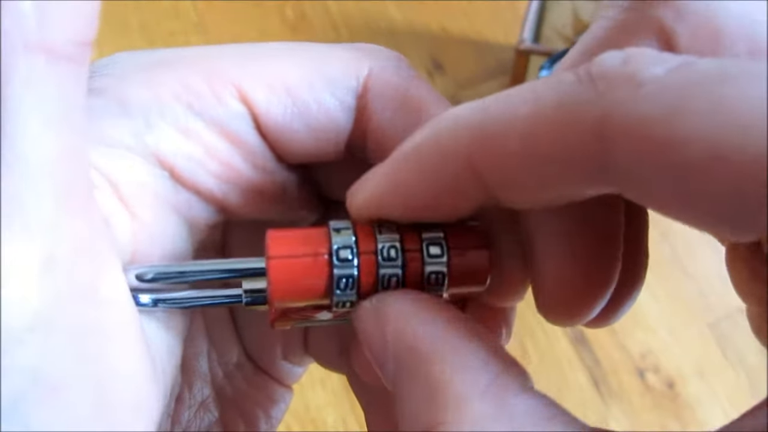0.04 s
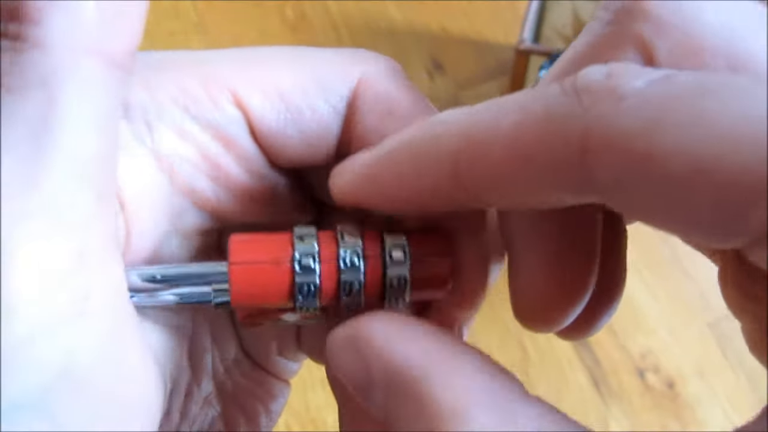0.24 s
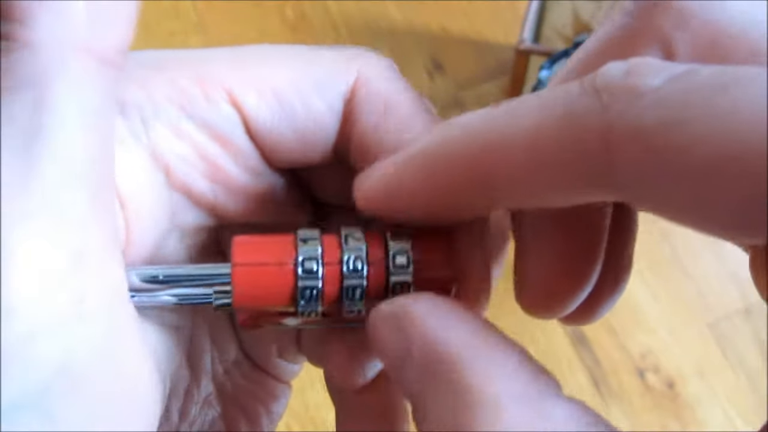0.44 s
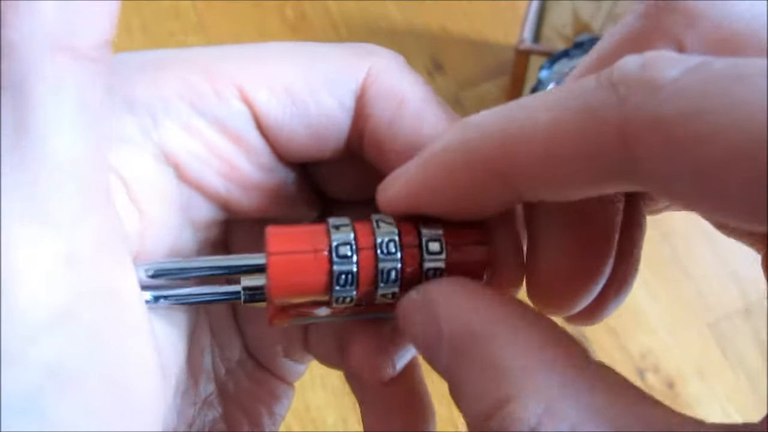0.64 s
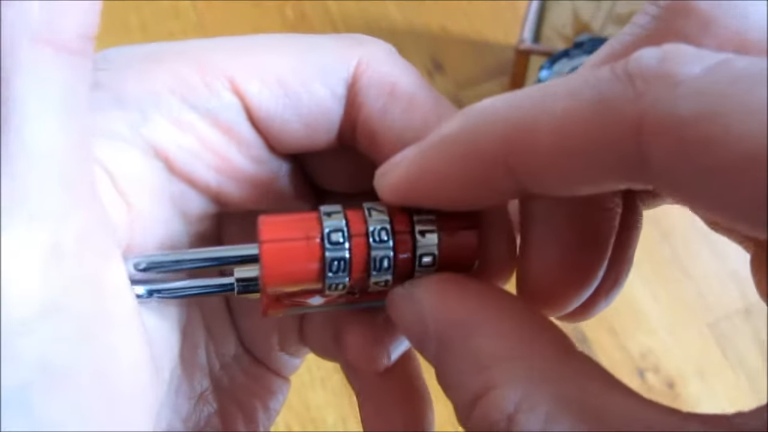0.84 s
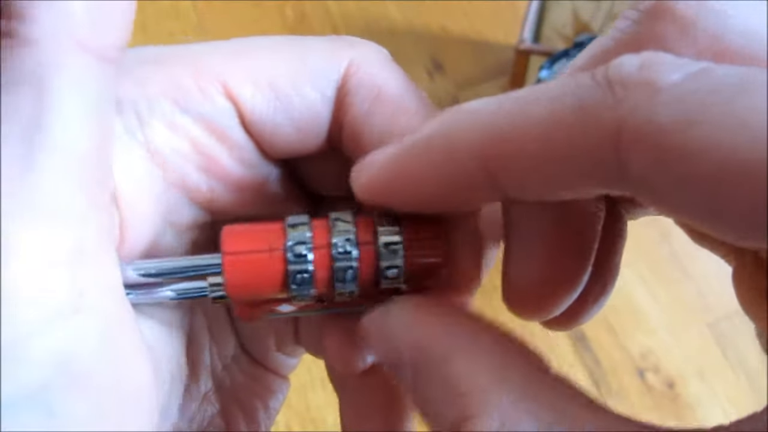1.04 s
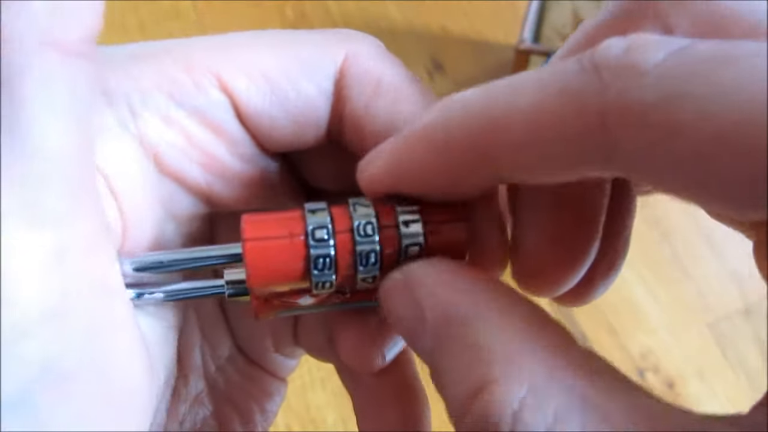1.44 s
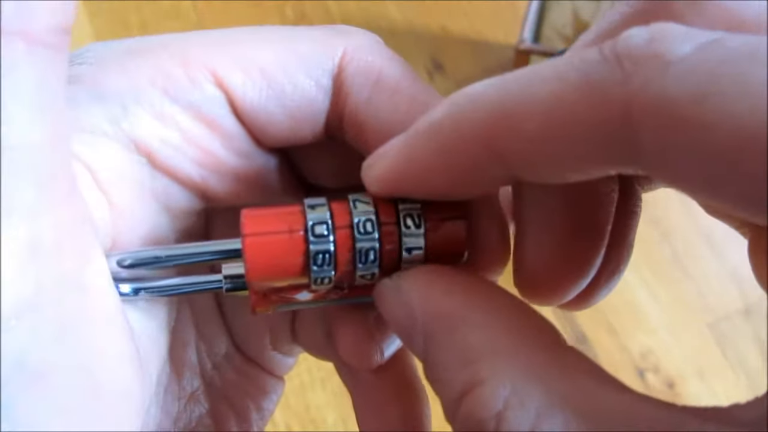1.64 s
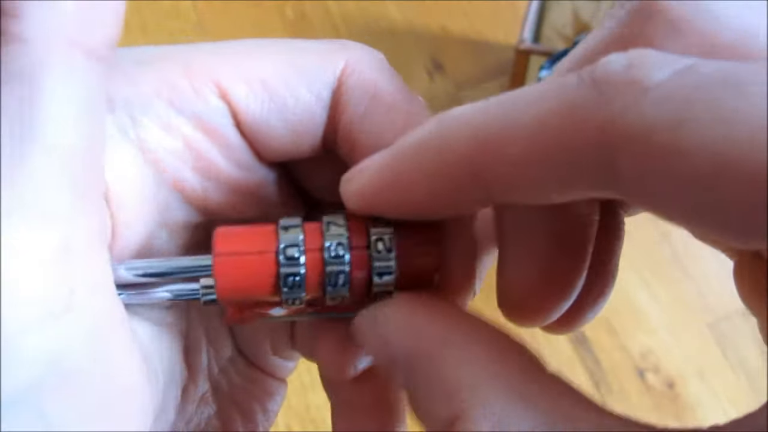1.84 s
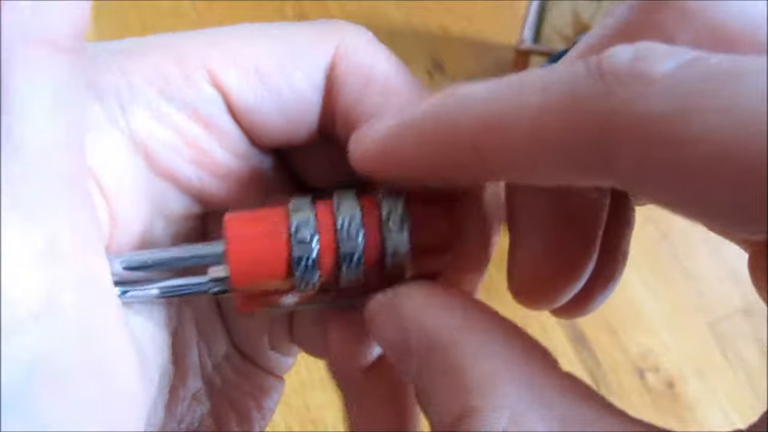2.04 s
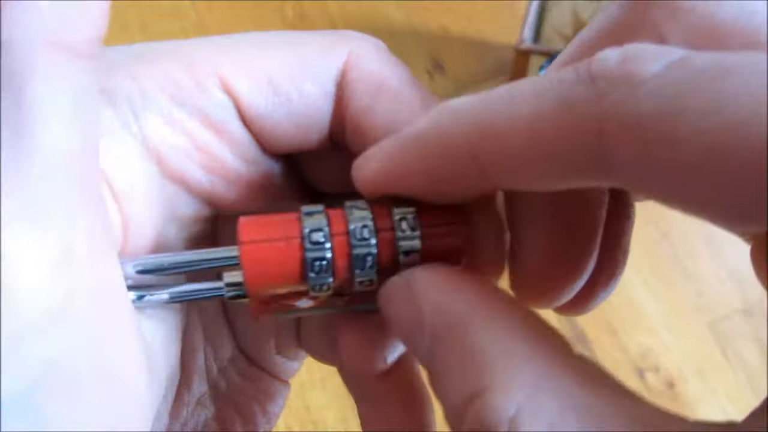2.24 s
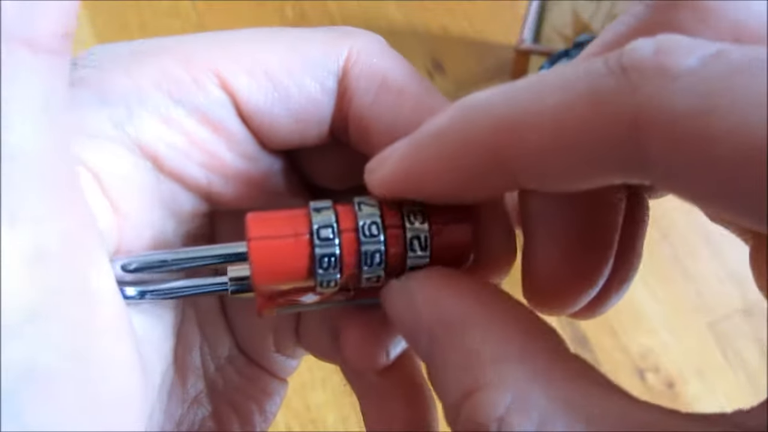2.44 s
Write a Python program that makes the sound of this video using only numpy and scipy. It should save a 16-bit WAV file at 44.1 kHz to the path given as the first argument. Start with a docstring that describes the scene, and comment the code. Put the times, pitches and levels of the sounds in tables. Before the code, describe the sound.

A small combination padlock clicks close to the microphone. Its dials snap from notch to notch, alternating irregularly with sharper knocks of the tugged metal shackle and light rattling, over a quiet room's low hum.

```python
"""A small three-dial combination padlock is handled close by, over a quiet room's rumble and hum.
First loose parts tick; at 0.2 s a dial's spring scrapes up its ramp and snaps into a detent, and the
tugged shackle knocks on its stop. Snaps and knocks then alternate, with light rattling and two faint
stick-slip squeaks; from 2 s on, a last few snaps and ticks follow. Each impact excites damped modes
of the metal, which die away in the room."""
import sys
import numpy as np
from scipy import signal
from scipy.fft import rfft, irfft
from scipy.io import wavfile
from scipy.ndimage import uniform_filter1d

SR = 44100
rng = np.random.default_rng(int(sys.argv[2]) if len(sys.argv) > 2 else 0)


def wrap_up_sound(samples):
    """Save the sound to the file named by the first command line argument, as 16-bit audio."""
    columns = np.atleast_2d(samples).T
    # keep every value between -1 and 1, then stretch to whole-number steps
    tamed = np.clip(columns, -1, 1)
    steps = np.round(tamed * 32767).astype(np.int16)
    wavfile.write(sys.argv[1], SR, steps)


N = 110250
HIT_SIZE, REF_SIZE = 2048, 88  # samples: one contact's buffer, the 2 ms energy reference
RISE_S = 0.000068  # onset of a contact force

# Normal modes of casing, shackle and dial rim: f/Hz, relative level/dB, T60/s
CASING_MODES = [(3350, -21.5, .008), (4550, -3, 0.0024), (4984, 29, 0.013), (5400, -7, .006)]
SHACKLE_MODES = [(7560, -4.5, 0.022), (7920, 8.5, 0.018), (8060, 12.5, 0.0055)]
RIM_MODES = [(13900, 0, .006), (15200, -2, .005)]
# Spectrum of the shackle's contacts: f/Hz, relative density level/dB
SHACKLE_SPECTRUM = [(60, -41.5), (300, -25.5), (800, -20), (1300, -34), (2100, -12.5), (2900, -9),
                    (4500, -3), (6500, 1), (9400, 6.5), (11000, 3), (12500, -16), (15000, -5.5),
                    (16000, -14.5)]


def undb(db):
    """Amplitude ratio of a level in decibels."""
    return 10 ** (np.asarray(db) / 20)


def unit(x):
    """Normalisation to unit rms."""
    return x / np.sqrt(np.mean(x ** 2))


def burst(x):
    """Normalisation to the energy of 2 ms at unit rms."""
    return unit(x) * np.sqrt(REF_SIZE / x.shape[-1])


def pan(db):
    """Channel gains for a level difference, left minus right."""
    return undb(np.array([[db], [-db]]) / 2)


def add(out, start_s, x):
    """Linear superposition of a sound at its onset time."""
    i = int(start_s * SR)
    out[:, i:i + x.shape[1]] += x[:, :N - i]


def colour(x, spectrum, tilt_db=0):
    """Minimum-phase filtering by a spectrum, tilted by tilt_db per octave above 1.5 kHz."""
    n = x.shape[-1]
    octave = np.log2(np.maximum(np.fft.rfftfreq(n, 1 / SR), 1))
    hz, db = np.array(spectrum).T
    slope_db = tilt_db * np.maximum(octave - np.log2(6000), -2)  # pivot at 6 kHz
    gain = undb(np.interp(octave, np.log2(hz), db) + slope_db)
    cepstrum = irfft(np.log(gain), n)
    cepstrum[1:n // 2] *= 2  # folding the cepstrum makes the filter causal
    cepstrum[n // 2 + 1:] = 0
    return irfft(rfft(x) * np.exp(rfft(cepstrum, n)), n)


def background():
    """Stationary room noise: partly coherent rumble and hiss, plus frequency-modulated hum tones."""
    # Rumble and hiss: f/Hz, relative density level/dB
    rumble_spectrum = [(20, -39.5), (38, -25), (60, -14.5), (90, -5.5), (125, -4), (180, 2.5), (250, -3.5),
                       (330, -11.5), (500, -8.5), (800, -16), (1500, -23), (2600, -27), (4000, -34.5),
                       (6000, -34), (9000, -42.5), (12000, -51), (16000, -55.5)]
    # Hum tones: f/Hz, level/dB
    hum_tones = [(71, -59), (120, -52.5), (162, -56.5), (240, -56), (441, -66)]
    noise = rng.standard_normal((3, N))
    partly_coherent = noise[:2] + 0.132 * noise[2]
    out = undb(-45) * unit(colour(partly_coherent, rumble_spectrum))
    for hz, db in hum_tones:
        wander_hz = 2.72 * unit(uniform_filter1d(rng.standard_normal((2, N)), size=4000, axis=1))
        cycles = np.cumsum(hz + wander_hz, axis=1) / SR + rng.random((2, 1))
        out += undb(db) * unit(np.sin(2 * np.pi * cycles))
    return out * pan(-1.5)


def room(x):
    """Reverberation: a small room's diffuse field builds up and decays exponentially."""
    # Colour of the reverberation: f/Hz, gain/dB
    room_spectrum = [(300, 14), (2000, 2.5), (5500, -2.5), (8300, -2.5), (11000, -9), (15000, -10)]
    t60_s, build_up_s = 0.31, 0.004
    t = np.arange(SR // 2) / SR
    envelope = np.exp(-np.log(1000) * t / t60_s) * np.minimum(t / build_up_s, 1) ** 2
    tail = rng.standard_normal((2, len(t))) * envelope
    tail = colour(unit(tail) / np.sqrt(len(t)), room_spectrum)
    return undb(-16.5) * signal.fftconvolve(x.mean(axis=0)[None], tail, axes=1)[:, :N]


def palm(x):
    """Comb filtering: a contact interferes with its reflection from the cupped hand."""
    delay_s = rng.uniform(0.00048, 0.0012)
    return burst(x + undb(-3) * np.roll(x, int(delay_s * SR), axis=1))


def impulse_response(modes, size, detune):
    """Modal superposition: damped sinusoids with a random relative frequency spread, detune."""
    t = np.arange(size) / SR
    out = np.zeros(size)
    for hz, db, t60_s in modes:
        detuned_hz = hz * (1 + detune * rng.standard_normal())
        out += undb(db) * np.sin(2 * np.pi * detuned_hz * t) * np.exp(-np.log(1000) * t / t60_s)
    return out


def ring(force, modes, pitch=1):
    """Forced response: the contact force is convolved with the modes, which the grip detunes a little."""
    tuned = [(hz * pitch, db, t60_s) for hz, db, t60_s in modes]
    response = impulse_response(tuned, HIT_SIZE, detune=0.012)
    return burst(signal.fftconvolve(force, response[None], axes=1)[:, :HIT_SIZE])


def after_ring(x):
    """Free decay: lightly damped modes of the metal ring on faintly after the shackle's contacts."""
    # Long-lived modes: f/Hz, relative level/dB, T60/s
    lasting_modes = [(4290, -4, 0.22), (4550, -5.5, .25), (5453, -6, .3), (5600, 0.5, .33), (7418, -6, .3),
                     (7610, -2, .3), (8129, -6.5, .2), (8355, -8, .22), (8737, -7.5, .25), (9641, -10, .3)]
    tail = impulse_response(lasting_modes, SR // 2, detune=0)
    tail /= np.linalg.norm(tail)
    return undb(-36.5) * signal.fftconvolve(x, tail[None], axes=1)[:, :N]


def roughness():
    """Rough surfaces give a random force; left and right differ most in the treble."""
    mid, side = rng.standard_normal((2, HIT_SIZE))
    side = (side - np.roll(side, 2)) / 2
    return mid + 0.46 * np.array([side, -side])


def impact(decay_s):
    """A brief impact is broadband: a fast-dying chatter of force with a flattened spectrum."""
    t = np.arange(HIT_SIZE) / SR
    rise, decay = 1 - np.exp(-t / RISE_S), np.exp(-t / decay_s)
    spectrum = rfft(roughness() * rise * decay)
    whitened = irfft(spectrum / np.sqrt(np.mean(abs(spectrum) ** 2, axis=0)))
    return whitened * np.minimum(1, 10 * decay)  # keeps the whitened pulse short


def friction(length_s):
    """Sliding friction: a steady random force with short ramps at both ends."""
    t = np.arange(HIT_SIZE) / SR
    return roughness() * np.clip(np.minimum(t, length_s - t) / (2 * RISE_S), 0, 1)


def squeaks():
    """Stick-slip motion sustains a single mode for a moment."""
    # Slips of metal on metal: t/s, duration/s, f/Hz, level/dB
    slips = [(0.625, .012, 3300, -57.5), (1.017, 0.017, 7650, -44.5)]
    out = np.zeros((2, N))
    for start_s, length_s, hz, db in slips:
        t = np.arange(int(length_s * SR)) / SR
        tone = np.sin(2 * np.pi * hz * t) * np.sqrt(np.sin(np.pi * t / length_s))
        add(out, start_s, undb(db) * pan(-5) * unit(tone))
    return out


def rattle():
    """Light impacts of the loose dials and shackle excite the casing's modes."""
    # Ticks of loose parts: t/s, level/dB, tilt/(dB/octave)
    ticks = [(.1700, -51.5, -6), (0.1794, -49.5, 4), (0.1868, -38, 1), (.3710, -47, 0), (0.4222, -40.5, 4),
             (.6190, -50, 10), (0.6265, -48, -3), (0.6612, -36, 2), (0.6948, -41, 5.5), (0.9541, -52.5, -3),
             (1.029, -43.5, -19), (1.2532, -37, -1), (1.2578, -47, -4), (1.4858, -45, 8),
             (1.4963, -45, -11), (1.5068, -38.5, -2), (1.5123, -32, 2.5), (1.5257, -44, -9),
             (1.5394, -51, 4), (1.638, -52, 12), (1.775, -55.5, -2), (1.8191, -34, 0.5), (1.8280, -49, -4),
             (1.8400, -37.5, -13.5), (1.8504, -37.5, -2.5), (2.0536, -44, -1), (2.0794, -37, 6),
             (2.0918, -38.5, -10.5), (2.267, -47, 1), (2.3504, -42, -3.5)]
    # Spectrum of a tick: f/Hz, relative density level/dB
    tick_spectrum = [(60, -33), (400, -5.5), (1400, -13), (2200, 0), (3000, -10), (4900, 6), (6300, -4),
                     (7900, -0.5), (10500, -11), (12500, -16.5), (16000, -21.5)]
    out = np.zeros((2, N))
    for start_s, db, tilt_db in ticks:
        force = impact(decay_s=0.00076)
        click = burst(colour(force, tick_spectrum, tilt_db))
        pitch = 1 + 0.028 * rng.standard_normal()  # each tick lands on another spot of the casing
        casing = undb(-10) * ring(force, CASING_MODES, pitch)
        add(out, start_s, undb(db) * burst(click + casing))
    return out


def shackle_slides():
    """Frictional excitation: the tugged shackle slides and sings in its modes."""
    # Slides: t/s, duration/s, level/dB
    slides = [(.211, 0.011, -39), (0.43, 0.0053, -27), (1.015, .017, -46.5), (1.268, 0.019, -33.5)]
    out = np.zeros((2, N))
    for start_s, length_s, db in slides:
        force = friction(length_s)
        scrape = undb(-5.5) * burst(colour(force, SHACKLE_SPECTRUM, tilt_db=-5.5))
        song = ring(force, SHACKLE_MODES) + scrape
        song = unit(song) * np.sqrt(length_s * SR / HIT_SIZE)  # energy grows with duration
        add(out, start_s, undb(db) * pan(-1.5) * song)
    return out


def shackle_knocks():
    """Impact excitation: the shackle strikes its stop and rings with the casing and dial rims."""
    # Knocks: t/s, level/dB, tilt/(dB/octave), casing ring/dB, casing frequency ratio,
    # shackle ring/dB, rim ring/dB, contact decay/s, left minus right/dB
    knocks = [(.2083, -24, 2, -4.5, 0.81, 12.5, -15, 0.0015, -3.5),
              (0.219, -35, -6.5, -24, 1, -9.5, -19, 0.00078, -1),
              (.4308, -19.5, 9.5, -0.5, 0.94, -0.5, -8, 0.002, -4.5),
              (.4324, -17, 9, -13.5, 0.8, -14.5, -22.5, 0.0017, 8),
              (.4392, -26, 9, -16, 0.81, -3, -13.5, 0.00065, 8),
              (1.0106, -20.5, -5, -14.5, 1.01, 9.5, 1, 0.00081, 0.5),
              (1.2698, -18.5, 4, -3, 0.97, -19, -10.5, 0.00084, 4),
              (1.2765, -34, -8, 5, 1.12, -11, -10, .0025, 3),
              (1.2810, -23.5, -3.5, 2.5, 0.94, -21, -13, .0015, -4),
              (1.2837, -25.5, -6, 19, 1.09, -26, -17, .0012, 1),
              (1.8214, -30.5, -5, -25, 1.2, 4, -6.5, 0.0015, 2)]
    out = np.zeros((2, N))
    for start_s, db, tilt_db, casing_db, pitch, shackle_db, rim_db, decay_s, pan_db in knocks:
        force = impact(decay_s)
        click = burst(colour(force, SHACKLE_SPECTRUM, tilt_db))
        casing = undb(casing_db) * ring(force, CASING_MODES, pitch)
        shackle = undb(shackle_db) * ring(force, SHACKLE_MODES)
        rim = undb(rim_db) * ring(force, RIM_MODES)
        add(out, start_s, undb(db) * pan(pan_db) * palm(click + casing + shackle + rim))
    return out


def dial():
    """Release of elastic energy: the spring scrapes up its ramp, snaps and rings with casing and rim."""
    # Snaps into a detent: t/s, level/dB, tilt/(dB/octave), spring ring/dB, casing ring/dB,
    # rim ring/dB, contact decay/s
    detents = [(0.2076, -18.5, 3.5, -4, -9, -2.5, 0.00044), (0.3488, -22, -3, 3.5, -11.5, -20, 0.0014),
               (0.3524, -32.5, -1, -3, -4.5, -12, .002), (.5906, -29, -4.5, 2, -15, -17.5, 0.0013),
               (1.1856, -20.5, -1.5, -7.5, -9, -17, 0.0017), (1.1906, -33, -5, -12, -8, -11, 0.0016),
               (1.4279, -20, -2.5, 0.5, -15, -24, 0.0012), (1.9905, -23.5, -1.5, -1, -7, -13.5, 0.00081),
               (1.9937, -26.5, -9, 4.5, -16.5, -10, 0.0019), (2.0724, -33.5, -8, -12, -26, -11.5, 0.00063),
               (2.2451, -26, -6, 4, -15, -7, 0.0013), (2.253, -30, -2, -24.5, -12, -11.5, 0.00088)]
    # Normal modes of the detent spring: f/Hz, relative level/dB, T60/s
    spring_modes = [(9700, -6, .007), (10437, 19.5, 0.011), (10640, 0, 0.011)]
    # Spectrum of the spring's contact: f/Hz, relative density level/dB
    detent_spectrum = [(60, -43.5), (400, -13.5), (1400, -41), (2100, -16), (2900, -21.5), (4900, 0.5),
                       (6600, -3), (10000, 7.5), (12400, -10.5), (14500, 3.5), (16000, 1.5)]
    scrape_s = 0.0027
    out = np.zeros((2, N))
    for start_s, db, tilt_db, spring_db, casing_db, rim_db, decay_s in detents:
        force = impact(decay_s)
        click = burst(colour(force, detent_spectrum, tilt_db))
        spring = undb(spring_db) * ring(force, spring_modes)
        casing = undb(casing_db) * ring(force, CASING_MODES)
        rim = undb(rim_db) * ring(force, RIM_MODES)
        add(out, start_s, undb(db) * palm(click + spring + casing + rim))
        scrape = burst(colour(friction(scrape_s), detent_spectrum))
        add(out, start_s - scrape_s, undb(-37) * scrape)
    return out


def scene():
    """Superposition of the lock's direct sound, arriving first on the left, its reverberation and noise."""
    shackle = shackle_knocks() + shackle_slides()
    lock = dial() + shackle + after_ring(shackle) + rattle() + squeaks()
    right_lag_s = 0.000004
    phase_lag = np.exp(-2j * np.pi * np.fft.rfftfreq(N, 1 / SR) * right_lag_s)
    direct = np.array([lock[0], irfft(rfft(lock[1]) * phase_lag, N)])
    return direct + room(lock) + background()


def record(dry):
    """Band limiting: an elliptic low-pass removes the treble above 15.8 kHz."""
    return signal.sosfilt(signal.ellip(8, 0.2, 70, 15800, fs=SR, output="sos"), dry)


dry = scene()
out = record(dry)
wrap_up_sound(out)
```